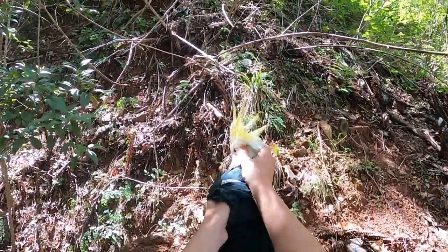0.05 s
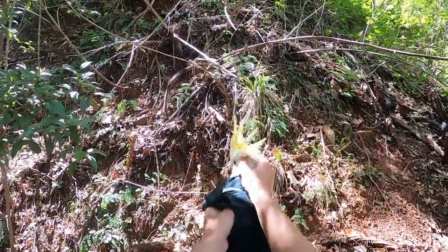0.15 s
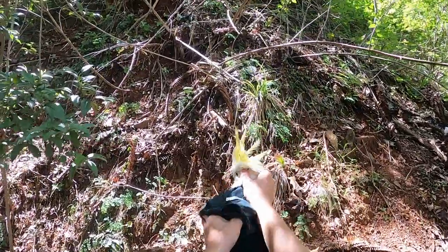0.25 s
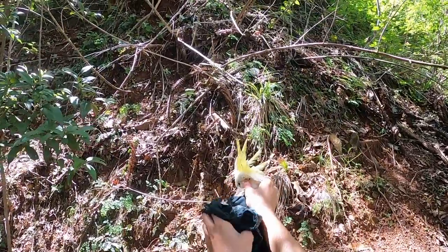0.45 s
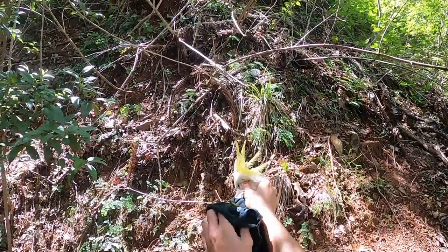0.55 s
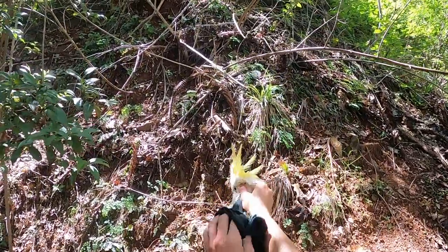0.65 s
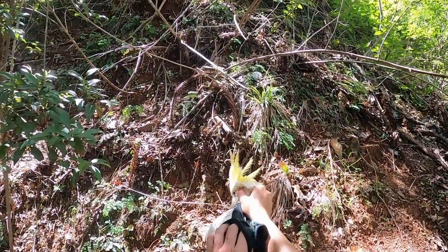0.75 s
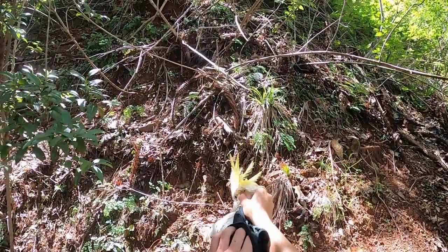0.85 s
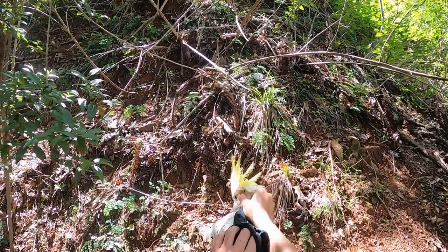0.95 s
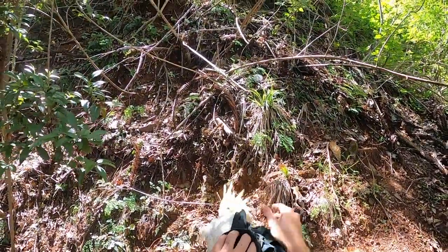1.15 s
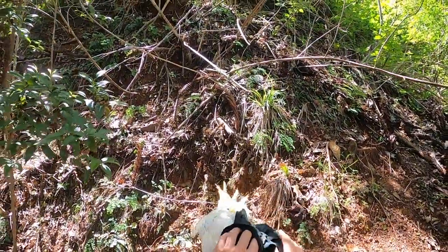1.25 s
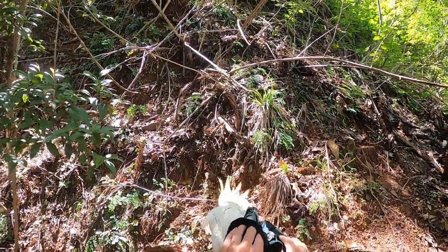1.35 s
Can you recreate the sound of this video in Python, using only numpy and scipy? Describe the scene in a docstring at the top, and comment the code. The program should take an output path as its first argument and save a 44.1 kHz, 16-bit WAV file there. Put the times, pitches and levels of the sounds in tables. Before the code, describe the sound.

A hand-held young cockatoo lets out one harsh, grating screech about a second long, opening and ending with a tiny squeal; close and dry outdoors, with faint insect hiss and low rustle behind.

```python
"""Cockatoo screech on a wooded slope

A young cockatoo held in the hand gives one harsh, rattling screech, with a brief squeal at each end.
Its voice membranes slap roughly 100 times a second, now evenly, now in ragged clusters. Each slap is
a click that rings the throat, a set of resonances, along with puffs of air made from noise.
Behind it, filtered noise makes a low rustle and hissing insects, and a low wavering sine hums.
"""
import sys
import numpy as np
from scipy import signal
from scipy.fft import rfft, irfft
from scipy.io import wavfile
from scipy.ndimage import uniform_filter1d, minimum_filter1d, map_coordinates

SR = 44100
rng = np.random.default_rng(int(sys.argv[2]) if len(sys.argv) > 2 else 0)


def output_pcm(signal):
    """Save a mono or channel-first signal as 16-bit PCM at the path in sys.argv[1].

    Samples are clipped to [-1, 1] before scaling.
    """
    pcm = np.clip(np.atleast_2d(signal).T, -1, 1) * 32767
    wavfile.write(sys.argv[1], SR, np.round(pcm).astype(np.int16))


N = 61739


def undb(db):
    """Turn decibels into a gain."""
    return 10 ** (np.asarray(db) / 20)


def curve(table, axis=1):
    """Join one column of a table by straight lines in time."""
    rows = np.array(table, float)
    return np.interp(np.arange(N) / SR, rows[:, 0], rows[:, axis])


def unit(x):
    """Scale to rms 1."""
    return x / np.sqrt(np.mean(x ** 2) + 1e-18)


def smooth(x, seconds):
    """Average twice over a short sliding window."""
    k = max(int(seconds * SR), 1)
    return uniform_filter1d(uniform_filter1d(x, k), k)


def even(x):
    """Hold the short-term level at rms 1."""
    return x / np.sqrt(abs(smooth(x ** 2, .02)) + 1e-12)


def walk(seconds):
    """Drift slowly at random, with rms 1."""
    return unit(smooth(rng.standard_normal(N), seconds))


def colour(x, points, ring=1):
    """Filter along (Hz, dB) points; ring 1 only rings afterwards, ring 0 is symmetric in time."""
    hz, db = np.array(points, float).T
    half = 1024
    f = np.maximum(np.arange(half + 1) * SR / (2 * half), 1)
    log_gain = np.log(undb(np.interp(np.log(f), np.log(hz), db)))
    # Folding the cepstrum forward in time gives the phase of a filter that only rings afterwards
    cepstrum = irfft(log_gain)
    cepstrum[1:half] *= 2
    cepstrum[half + 1:] = 0
    response = rfft(cepstrum)
    taps = np.roll(irfft(np.exp(response.real + 1j * ring * response.imag)), half)
    return signal.oaconvolve(x, taps)[half:half + N]


def tone(hz, waver, seconds):
    """A sine of rms 1 whose pitch wanders."""
    wandering_hz = hz * (1 + waver * walk(seconds))
    return np.sqrt(2) * np.sin(2 * np.pi * np.cumsum(wandering_hz) / SR)


LEFT_RIGHT = np.array([[1], [-1]])  # sign for the left and the right channel

# Tone colour of the rustle. Each row: frequency in Hz, relative level in dB.
RUSTLE_COLOUR = [(18, -52), (30, -16), (76, -26), (137, -13.5), (280, -3.5), (642, -12.5), (926, -18),
                 (1060, -17.5), (1170, -10.5), (1750, -15.5), (2340, -15), (2570, -47), (3000, -20),
                 (3900, -49), (6600, -120)]
# Loudness of the rustle, which the drone follows. Each row: time in seconds, level in dB.
RUSTLE_LEVEL = [(0, -49), (.09, -47.5), (.3, -49), (1.08, -55.5), (1.13, -71), (1.18, -63), (1.25, -46.5),
                (1.32, -41.5), (1.4, -41)]
RUSTLE_SIDE = 0.052  # share that differs between left and right
DRONE_HZ, DRONE_DB = 274.6, -8  # dB against the rustle


def rustle():
    """A low wash of noise with a wavering drone; both sink as the call ends, then return louder."""
    middle = unit(colour(rng.standard_normal(N), RUSTLE_COLOUR))
    difference = unit(colour(rng.standard_normal(N), RUSTLE_COLOUR))
    drone = undb(DRONE_DB) * tone(DRONE_HZ, waver=0.0513, seconds=0.023)
    low = middle + RUSTLE_SIDE * difference * LEFT_RIGHT + drone
    return low * undb(curve(RUSTLE_LEVEL) + 0.81 * walk(0.009))


# Tone colour of the insects. Each row: frequency in Hz, relative level in dB.
INSECT_COLOUR = [(900, -20), (1800, -11.5), (2500, -11), (3200, -10.5), (3800, 2), (4500, -5), (5800, -5.5),
                 (7000, -19), (8500, -32.5), (11000, -39), (14000, -78)]
# The chorus varies a little in loudness and stays stronger on the left.
# Each row: time in seconds, level in dB, left minus right in dB.
INSECT_LEVEL = [(0, -39.5, 3.5), (.1, -41.5, 3.5), (1.1, -42.5, 3.5), (1.25, -44.5, 4), (1.4, -40, 3.5)]


def insects():
    """A hissing chorus all around: separate noise on each side, its loudness drifting."""
    hiss = np.array([unit(colour(rng.standard_normal(N), INSECT_COLOUR)) for _ in range(2)])
    balance_db = LEFT_RIGHT * curve(INSECT_LEVEL, axis=2) / 2
    return hiss * undb(curve(INSECT_LEVEL) + 1.97 * walk(0.11) + balance_db)


# Loudness of the hum. Each row: time in seconds, level in dB.
HUM_LEVEL = [(0, -59), (.2, -53), (.33, -79), (.45, -74), (.6, -62), (.69, -55), (.8, -62), (.95, -72),
             (1.18, -75.5), (1.3, -55), (1.4, -57)]


def hum():
    """A low sine that wavers in pitch and comes and goes."""
    return tone(82.4, waver=0.01538, seconds=0.099) * undb(curve(HUM_LEVEL))


def forest():
    """The rustle, insects and hum added together."""
    return rustle() + insects() + hum()


# A thin whistle early in the rattle. Each row: time in seconds, pitch in Hz, relative level in dB.
WHISTLE = [(.14, 574, -48), (.162, 599, -33), (.19, 658, -29), (.23, 643, -34), (.265, 625, -34),
           (.33, 625, -75)]


def whistle():
    """A thin wavering sine beneath the slaps, early in the call."""
    return tone(curve(WHISTLE), waver=0.017, seconds=0.0019) * undb(curve(WHISTLE, axis=2))


# The squeal at each end. Each row: time in seconds, pitch in Hz, relative level in dB.
SQUEAL = [(.105, 316, -25), (.117, 314.4, -25.5), (.125, 446.6, -17), (.137, 464, -23.5), (.155, 517, -29),
          (.2, 562.5, -56), (1.04, 368.6, -42), (1.062, 351.2, -23), (1.073, 307.5, -19.5),
          (1.085, 263.8, -18), (1.10, 243, -31)]
# Resonances of the nearly closed beak. Each row: frequency in Hz, relative level in dB.
SQUEAL_COLOUR = [(270, -16), (450, -12), (620, -20.5), (790, -20.5), (920, 1), (1040, 4.5), (1200, -6.5),
                 (1400, -20), (1750, -10), (2030, -5.5), (2300, -27.5), (5000, -40.5)]
SQUEAL_WAVER = 0.0059  # share by which the pitch wanders


def squeal():
    """A pitched voice of eight harmonics that rises into the rattle and falls out of it."""
    pitch_hz = curve(SQUEAL) * (1 + SQUEAL_WAVER * walk(0.0021))
    phase = 2 * np.pi * np.cumsum(pitch_hz) / SR
    harmonics = sum(np.sin(k * phase) for k in range(1, 9))
    return even(colour(harmonics, SQUEAL_COLOUR)) * undb(curve(SQUEAL, axis=2))


START_S, STOP_S, ATTACK_S, RELEASE_S = .105, 1.087, 0.0021, 0.003


def gate(t, start, end):
    """Quick attack, hold, short ring-out."""
    return np.clip((t - start) / ATTACK_S, 0, 1) * np.exp(-np.maximum(t - end, 0) / RELEASE_S)


def clicks(times, sizes):
    """Clicks that can fall between samples, each drawn as a short windowed sinc."""
    out = np.zeros(N)
    at = times[:, None] * SR
    taps = np.floor(at).astype(int) + np.arange(-7, 9)
    shape = np.sinc(taps - at) * np.sinc((taps - at) / 8)
    np.add.at(out, np.clip(taps, 0, N - 1), sizes[:, None] * shape)
    return out


CHIRP_S_PER_OCTAVE = 0.000434


def chirp(x):
    """Make each slap sweep upward: parts above 1200 Hz come later, parts below it earlier."""
    f = np.arange(N // 2 + 1) * SR / N
    delay = CHIRP_S_PER_OCTAVE * np.log2(np.clip(f, 400, 8000) / 1200)
    # Delays added up over frequency become a phase shift
    return irfft(rfft(x) * np.exp(-2j * np.pi * np.cumsum(delay) * SR / N), N)


# Distance of the stray slaps from the main one. Each row: time in seconds, gap in seconds.
CLUSTER_GAP = [(.3, 0.002), (.65, 0.001742), (.92, 0.00169), (.97, 0.0024)]
CLUSTER_SCATTER = 0.172  # spread of the stray slaps, in units of their gap
CLUSTER_GAIN = 0.96  # size of the stray slaps when fully ragged
SHIMMER_DB = 0.5  # spread of slap sizes (dB; for main slaps, when fully ragged)


def stray_slaps(t, beats, main_size, rough, chance):
    """Extra slaps just before and just after each main slap, larger when the voice is ragged."""
    gap = np.interp(beats, t, curve(CLUSTER_GAP))
    out = np.zeros(N)
    for place, stray, strength in zip((-1, 1), chance[:2], chance[2:]):
        times = beats + gap * (place + CLUSTER_SCATTER * stray)
        out += clicks(times, main_size * rough * CLUSTER_GAIN * undb(SHIMMER_DB * strength))
    return out


# Raggedness of the voice. Each row: time in seconds, roughness (0 even, 1 fully ragged;
# slightly higher values only add air).
ROUGH = [(.11, 1.06), (.18, 0.93), (.205, 0.26), (.24, 0.56), (.275, 0.44), (.33, 0.28), (.38, 0.61),
         (.41, 0.71), (.43, 0.23), (.495, 0.33), (.515, 0.85), (.54, 0.27), (.59, 0.44), (.70, 1.03),
         (.79, 0.86), (.90, .55), (.93, 0.15), (.955, 0), (.97, 0.68), (1.02, 0.57), (1.08, 0.71)]
# Tone colour of the air puffs. Each row: frequency in Hz, relative level in dB.
AIR_COLOUR = [(300, -11.5), (1000, -19), (2200, -6.5), (4000, 0), (6000, -8.5), (12000, -5.5)]
AIR_DB, AIR_WIDTH, AIR_STEADY = 1, .12, .18  # dB against the slaps; puff width in cycles; constant part


def air_puffs(cycle, slap_level):
    """Breath noise that puffs with every slap, stronger when the voice is ragged."""
    from_slap = cycle - np.round(cycle)
    puff = AIR_STEADY + np.exp(-(from_slap / AIR_WIDTH) ** 2)
    noise = colour(rng.standard_normal(N), AIR_COLOUR)
    return unit(puff * (0.56 + curve(ROUGH)) * noise) * slap_level * undb(AIR_DB)


# How fast the membranes slap. Each row: time in seconds, rate in Hz.
RATE = [(0.105, 45.42), (0.15, 72.85), (0.2, 122.7), (0.29, 104.1), (0.35, 121.3), (0.39, 107),
        (0.42, 115.3), (0.49, 110.8), (0.59, 100.4), (0.63, 110.8), (0.68, 84.1), (0.75, 90.47),
        (0.82, 94.23), (0.865, 74.55), (0.905, 113.4), (0.945, 110.6), (0.985, 72.4), (1.06, 123.4)]
# Spells with two slaps a cycle. Each row: start and end in seconds, strength of the second slap 0-1.
DOUBLING = [(.692, 0.7, 0.4), (0.764, 0.784, 0.83), (0.924, 0.973, 0.74), (1.03, 1.078, 0.72)]
JITTER = 0.0649  # spread of slap times when fully ragged, as a share of the cycle


def membranes(t):
    """The voice membranes give slaps, stray slaps and air puffs; also returns the cycle count."""
    phase = np.cumsum(curve(RATE) * (t > START_S)) / SR
    beats = np.interp(np.arange(int(phase[-1])) + .5, phase, t)
    period = 1 / np.interp(beats, t, curve(RATE))
    rough = np.clip(np.interp(beats, t, curve(ROUGH)), 0, 1)
    chance = rng.standard_normal(size=(200, 8))[:len(beats)].T  # one column per slap
    beats = beats + JITTER * rough * period * chance[0]
    size = undb(SHIMMER_DB * rough * chance[1])
    second = sum(share * gate(beats, start, end) for start, end, share in DOUBLING)
    slaps = clicks(beats, size * (1 - 0.37 * rough))
    slaps = slaps + clicks(beats + period / 2, size * second)
    strays = stray_slaps(t, beats, size, rough, chance[2:6])
    cycle = np.interp(t, np.sort(beats), np.arange(len(beats)))
    air = air_puffs(cycle, np.std(slaps + strays))
    return (chirp(slaps), chirp(strays), air), cycle


# Throat and beak resonances. Each row: frequency in Hz, relative level in dB early in the call,
# relative level in dB late in the call.
THROAT = [(115, -35, -52), (191, -31.5, -33), (294, -16, -20.5), (500, -14, -13.5), (613, -14.5, -15),
          (656, -6.5, -6), (859.4, -9, -27.5), (865.5, 3.5, -0.5), (1100, 3, 3.5), (1216, 1, -3),
          (1376, -11, 1), (1498, -3, -9), (1740, 6, 0), (2063, -23, -3.5), (2156, -10.5, -17),
          (2480, -15.5, -3.5), (2540, -21.5, -24), (2906, -14.5, -16.5), (3280, -11.5, -14.5),
          (3433, -9.5, -10.5), (3650, -20.5, -39), (3680, -9.5, -19.5), (3980, -17, -17),
          (4620, -15, -20.5), (5770, -21.5, -21.5), (5660, -23, -23.5), (6400, -30, -32), (7740, -39, -38),
          (8240, -53, -67), (8530, -34.5, -40), (10300, -54, -55.5), (12360, -59.5, -56), (14800, -77, -85)]
THROAT_SHIFT_S = (.28, .7)  # start and end of the change from early to late
RING_SHARE = 0.43  # 1: a slap only rings out; 0: it builds up as slowly as it dies


def throat(t, x, stretch):
    """Resonances that pass from their early to their late shape, all shifted in pitch by the stretch."""
    rows = np.array(THROAT, float)
    # Warp time, filter, then warp back: the source keeps its timing while the resonances move
    clock = np.cumsum(stretch) / SR
    warped = map_coordinates(x, [np.interp(t, clock, t) * SR])
    early = map_coordinates(colour(warped, rows[:, [0, 1]], RING_SHARE), [clock * SR])
    late = map_coordinates(colour(warped, rows[:, [0, 2]], RING_SHARE), [clock * SR])
    return early + np.interp(t, THROAT_SHIFT_S, [0, 1]) * (late - early)


# Loudness of the rattle's five registers. Each row: time in seconds, then relative level in dB of
# the low body, the main resonance, the second resonance, the third resonance and the treble.
LEVELS = [(0.11, -42, -23.5, -36, -47, -32), (0.136, -26, -24, -24.5, -31.5, -27.5),
          (0.188, -34.5, -24.5, -27, -30, -29), (0.214, -35.5, -24, -33, -28, -28.5),
          (0.27, -34, -23.5, -33.5, -31.5, -31.5), (0.47, -37, -24, -28.5, -39.5, -32.5),
          (0.496, -36, -23.5, -27.5, -35, -32), (0.514, -36, -27.5, -23.5, -47, -34),
          (0.526, -36.5, -23, -37, -31, -35.5), (0.548, -38, -23, -30.5, -31, -34.5),
          (0.658, -36, -24.5, -25.5, -36.5, -33.5), (0.746, -36, -25.5, -26.5, -34.5, -37),
          (0.784, -37.5, -24.5, -24.5, -28.5, -26.5), (0.792, -33, -24.5, -26, -35, -41),
          (0.812, -36.5, -24.5, -30, -30.5, -34.5), (0.85, -34, -25, -24, -34, -32.5),
          (0.922, -35.5, -24.5, -27, -26, -31), (0.94, -36, -27, -34, -34.5, -40.5),
          (0.958, -32.5, -23, -18.5, -29.5, -30.5), (1.042, -35.5, -25, -22, -33.5, -32.5),
          (1.085, -50, -17.5, -21, -39, -30.5)]
# How each register answers, one row each from low to high. Each row: share of the stray slaps,
# share of the air, spread from slap to slap in dB before evening out (a minus sign flips it).
REGISTERS = [(0.48, 0.78, 1.5), (0.44, 0.69, 0.5), (1.52, 0.78, 3), (1, .9, -1), (0.55, 0.71, 2)]
SPLIT_HZ = (820, 1450, 2250, 2750)  # borders between the registers
THROAT_WANDER, THROAT_WANDER_S = 0.016, 0.0074  # share by which resonances drift; smoothing time


def rattle(t):
    """The slaps ring the throat; five registers swell on their own and change with every slap."""
    sources, cycle = membranes(t)
    stretch = 1 + THROAT_WANDER * walk(THROAT_WANDER_S)
    rest = np.array([throat(t, x, stretch) for x in sources])
    out = np.zeros(N)
    for k, (stray_share, air_share, spread_db) in enumerate(REGISTERS):
        band = rest  # the last register takes all that is left
        if k < len(SPLIT_HZ):
            lowpass = signal.butter(N=10, Wn=SPLIT_HZ[k], fs=SR, output="sos")
            band = signal.sosfiltfilt(lowpass, rest)
        rest = rest - band
        slaps, strays, air = band
        accent = smooth(rng.standard_normal(size=200)[np.round(cycle).astype(int)], .001)
        voiced = (slaps + stray_share * strays + air_share * air) * undb(spread_db * accent)
        out = out + even(voiced) * undb(curve(LEVELS, axis=k + 1))
    return out


# The rattle grows out of the opening squeal and gives way to the closing one.
# Each row: time in seconds, change of level in dB.
RATTLE_FADE = [(.105, -12), (.12, -5.5), (.132, -3), (.15, 1), (1.055, 0.5), (1.066, -6.5), (1.088, -9.5)]
# Catches in the voice. Each row: time in seconds, half length in seconds, depth in dB.
CATCHES = [(.122, .0025, -11), (0.149, 0.0022, -9.5), (0.348, 0.003, -21), (.771, 0.0022, -10),
           (0.856, 0.0018, -3), (0.998, 0.0015, -6), (1.016, 0.0014, -8)]


def cockatoo(t):
    """The whole screech: rattle, squeals and whistle, with brief catches in the voice."""
    catch_db = sum(db * np.exp(-((t - s) / half) ** 2) for s, half, db in CATCHES)
    voice = rattle(t) * undb(curve(RATTLE_FADE)) + squeal() + whistle()
    return voice * gate(t, START_S, STOP_S) * undb(catch_db)


# Balance between the sides. Each row: frequency in Hz, left minus right in dB.
PAN = [(200, -2), (700, 0), (1400, 0.4), (2800, 1.4), (5000, -2.5), (8000, -2), (13000, -14)]
# Scatter from the slope. Each row: frequency in Hz, level in dB against the direct sound.
SCATTER = [(300, -18), (1200, -18), (1950, -10.5), (2500, -0.5), (5000, -5), (10000, 3)]
SCATTER_T60_S = 0.1  # time for the scatter to fade by 60 dB
LEFT_LAG_S, VOICE_DB = .000044, -0.5


def slope(t, voice):
    """The bird is slightly to the right; earth and leaves scatter a very short tail."""
    left = np.interp(t - LEFT_LAG_S, t, voice)
    early = t[t < .1]
    out = []
    for side, direct in ((1, left), (-1, voice)):
        tail = rng.standard_normal(len(early)) * undb(-60 * early / SCATTER_T60_S)
        echo = signal.oaconvolve(voice, tail / np.linalg.norm(tail))[:N]
        heard = direct + colour(echo, SCATTER)
        out.append(colour(heard, [(hz, side * db / 2) for hz, db in PAN], ring=0))
    return np.array(out) * undb(VOICE_DB)


def scene():
    """The screech in front of the forest."""
    t = np.arange(N) / SR
    return slope(t, cockatoo(t)) + forest()


PEAK_LIMIT, TOP_HZ = .42, 14300  # limiter threshold (full scale is 1); upper frequency limit


def record(dry):
    """A fast limiter holds down the sharpest peaks; the recorder cuts the top."""
    room = np.minimum(1, PEAK_LIMIT / (abs(dry).max(axis=0) + 1e-9))
    limited = dry * smooth(minimum_filter1d(room, size=90), .001)
    top_cut = signal.ellip(8, .2, 70, TOP_HZ, fs=SR, output="sos")
    return signal.sosfilt(top_cut, limited)


dry = scene()
out = record(dry)
output_pcm(out)
```